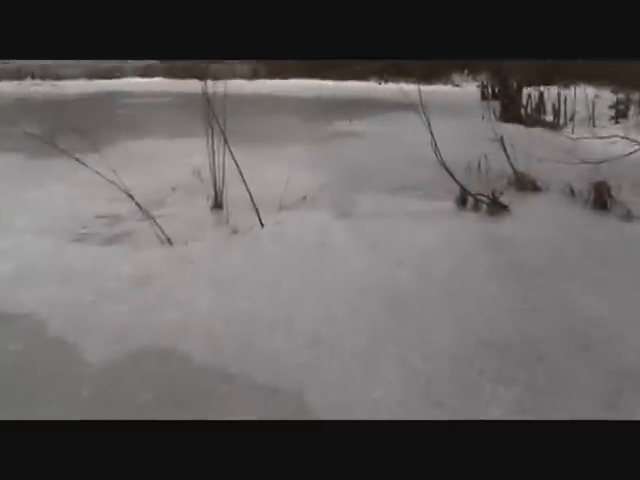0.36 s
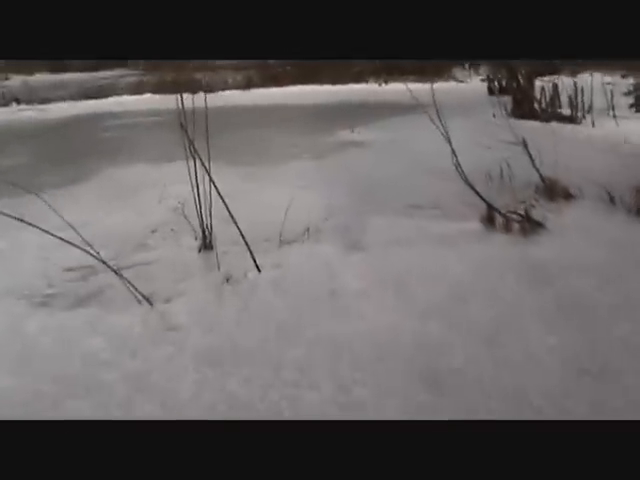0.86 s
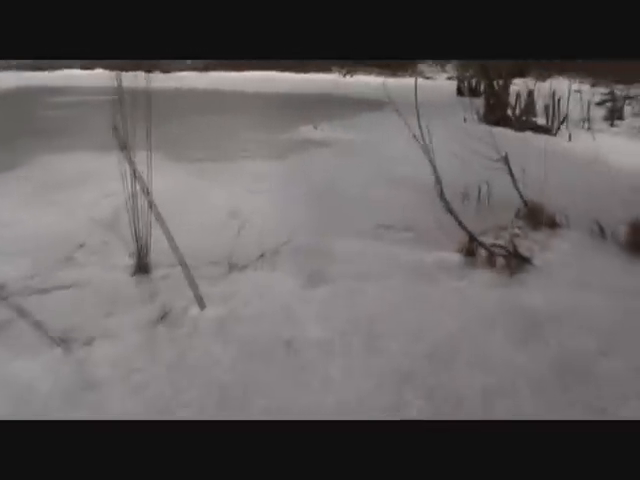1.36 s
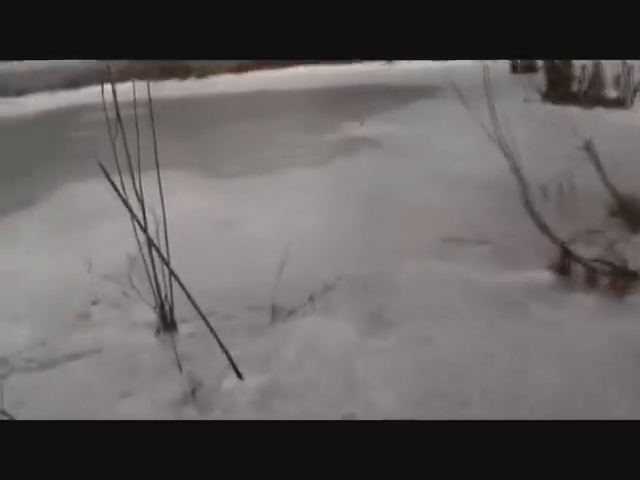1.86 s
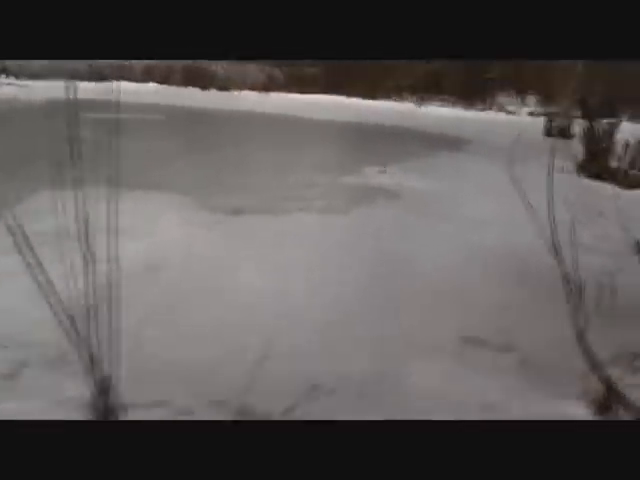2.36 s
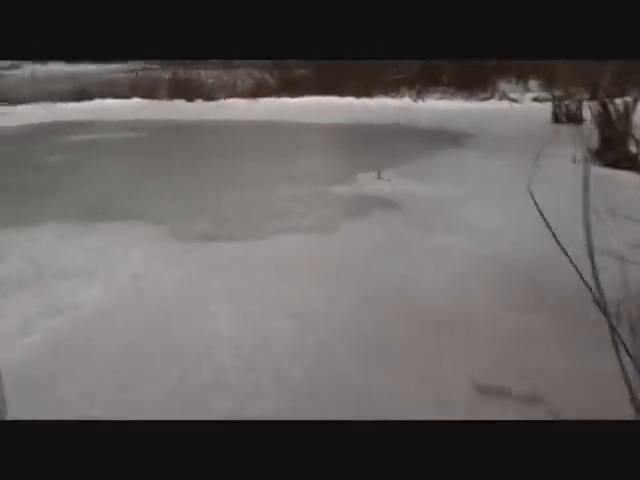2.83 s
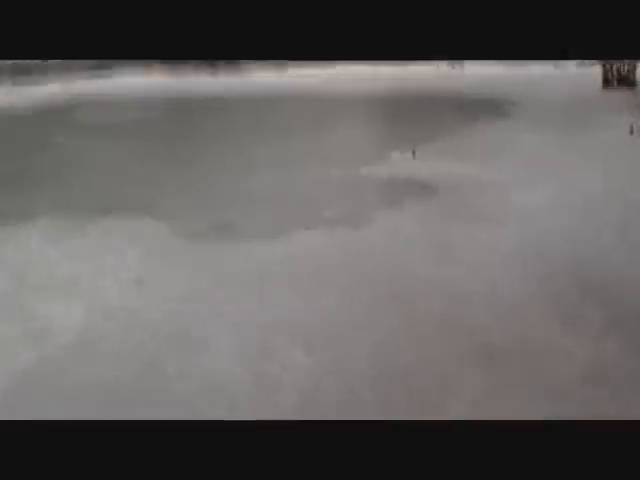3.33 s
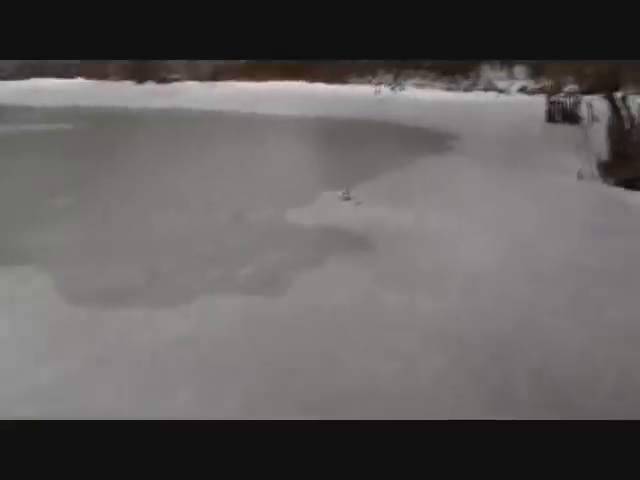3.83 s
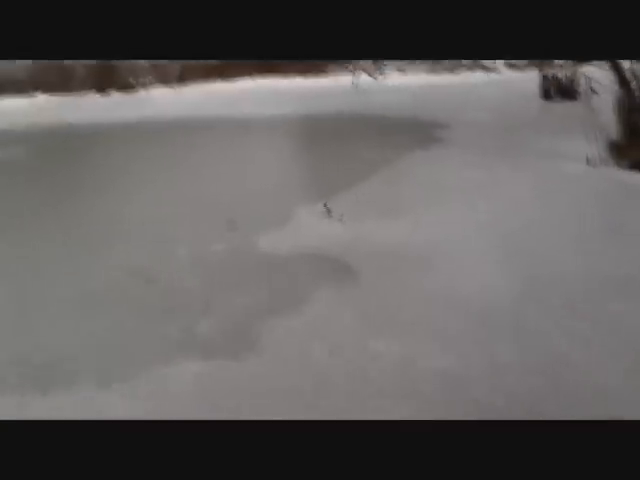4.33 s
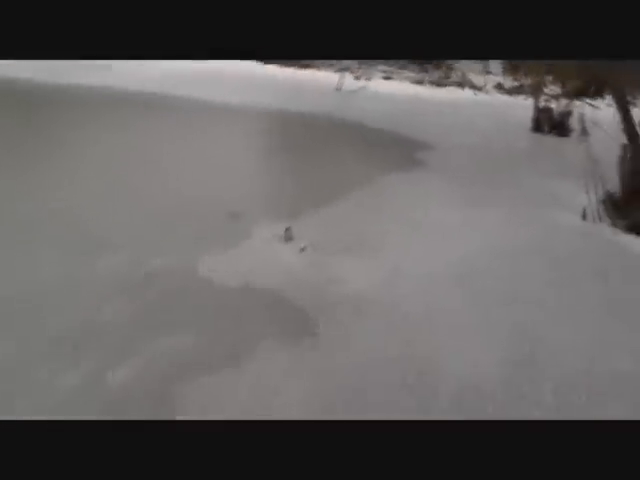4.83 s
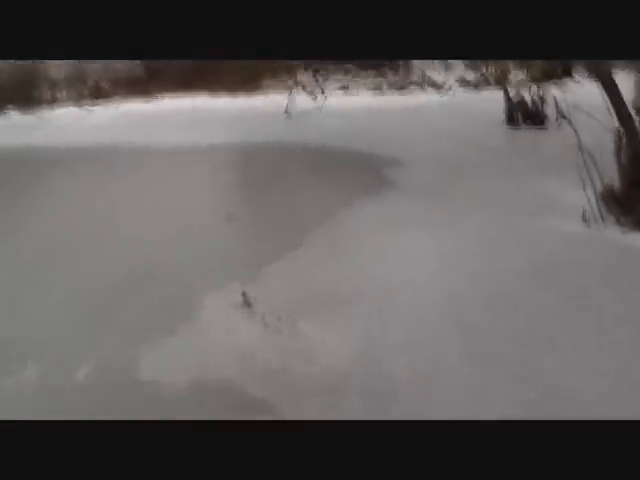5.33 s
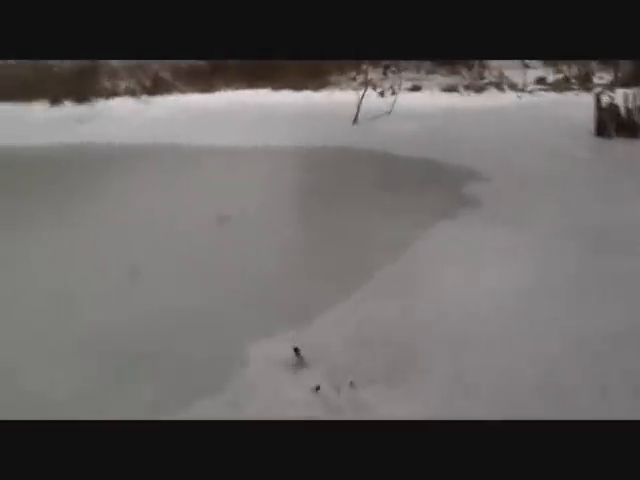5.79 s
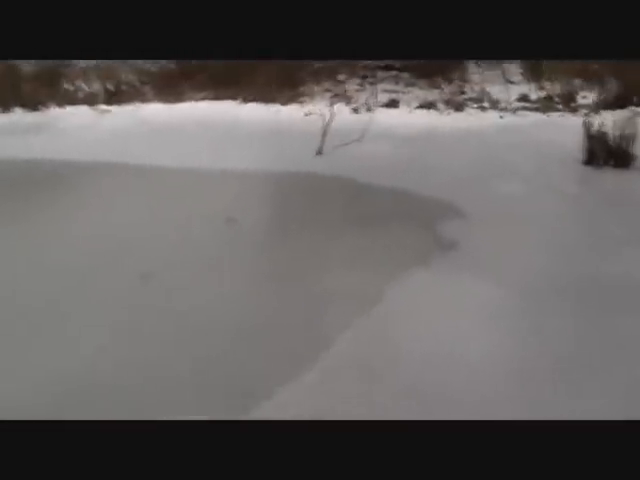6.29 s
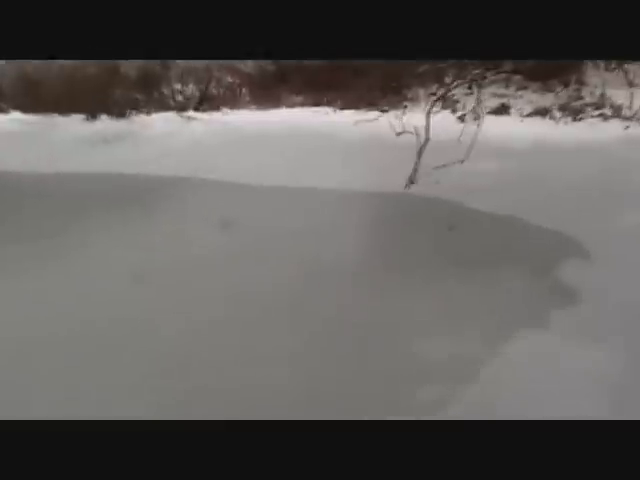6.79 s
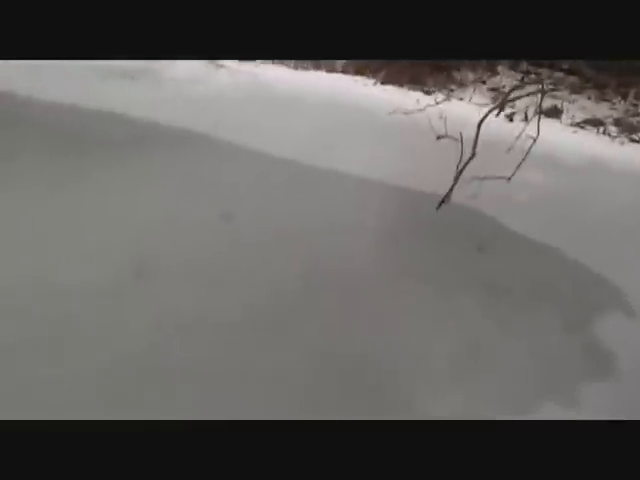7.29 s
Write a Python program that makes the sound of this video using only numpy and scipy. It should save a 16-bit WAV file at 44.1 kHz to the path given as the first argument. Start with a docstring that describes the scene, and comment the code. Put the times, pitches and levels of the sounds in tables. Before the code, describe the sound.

Steady crunching footsteps on icy snow, close and dry, in the open. The first is soft, then the steps become full and grinding, with one low heel thud near one second. Snaps and short pitched ice squeaks follow, rising higher in pitch later. A tiny bright metallic clink comes midway, then walking continues to the end. Handheld stereo microphone, hardly any background.

```python
"""Boots walk over crusted snow beside a frozen pond, heard from a small stereo microphone held by the walker.
From the start, over a faint hush of air, each step crushes the crust: noise bursts gathered in clumps ring
forty bands of resonators, and single cracks, kicked crumbs and scuffs are added to their envelopes.
At 1 s a heel thuds as a low damped sine; from 1.5 s lumps of ice squeak as narrow resonances.
Just before 5 s a small metal piece clinks in two decaying sines; the steps go on to the end."""
import sys
import numpy as np
from scipy import signal
from scipy.fft import rfft, irfft
from scipy.io import wavfile

SR = 44100
rng = np.random.default_rng(int(sys.argv[2]) if len(sys.argv) > 2 else 0)


def pcm_store(signal):
    """Save signal as 16-bit PCM."""
    levels = np.round(np.clip(np.atleast_2d(signal), -1, 1) * 32767)
    wavfile.write(sys.argv[1], SR, levels.astype(np.int16).T)


def volts(x):
    """Linear amplitude factor 10**(x/20) for a level x in dB, scalar or array-like."""
    e = np.asarray(x, float) / 20
    return 10 ** e


N = 337806


def rms_one(x):
    """Normalization: mean power becomes one."""
    return x / np.sqrt(np.mean(x ** 2) + 1e-20)


def at_hz(points, hz):
    """Interpolation on a logarithmic frequency axis."""
    point_hz, value = np.transpose(points)
    return np.interp(np.log(hz), np.log(np.maximum(point_hz, 1)), value)


def dying(clicks, t60):
    """Exponential decay: every click leaves an envelope that falls 60 dB in t60 seconds."""
    return signal.lfilter([1], [1, -volts(-60 / (t60 * SR))], clicks + 1e-18)


def resonance(x, hz, width):
    """Damped resonance: a pole pair with gain 1 at its peak and a bandwidth in Hz."""
    r = np.exp(-np.pi * width / SR)
    zeros = [(1 - r * r) / 2, 0, (r * r - 1) / 2]
    poles = [1, -2 * r * np.cos(2 * np.pi * hz / SR), r * r]
    return signal.lfilter(zeros, poles, x + 1e-18)


def grains(per_s, spread_db):
    """Shot noise: random clicks, mostly small and a few large, with rms 1."""
    sizes = volts(spread_db * np.minimum(rng.exponential(1, N), 5))
    return rms_one(sizes * (rng.random(N) < per_s / SR))


def clumps(per_s, spread_db, t60, steady):
    """Avalanche noise: pieces give way at once and crumble out, over a steady grinding."""
    crumbling = rms_one(dying(grains(per_s, spread_db), t60))
    return (steady + crumbling) / np.hypot(steady + 0.69, .8)


# Spectral slope of the open air. Each row: frequency in Hz, relative density in dB per Hz.
AIR_SPECTRUM = [(200, 4), (3000, -0.5), (15000, -7)]
AIR_DB = -45.5   # rms


def air():
    """Diffuse-field noise: a faint steady hush, uncorrelated in the two channels."""
    hz = np.maximum(np.fft.rfftfreq(N, 1 / SR), 1)
    spectrum = rfft(rng.standard_normal((2, N))) * volts(at_hz(AIR_SPECTRUM, hz))
    return volts(AIR_DB) * rms_one(irfft(spectrum, N))


# A boot takes weight, in a footfall or sinking further. Each row: full force in seconds, hold in seconds,
# nominal grit in dB, fade as the boot lifts in dB per second, lumps against grit in dB before the heel
# and toe change them, hollow packing snow against grit in dB likewise, rise before full force in seconds.
STEPS = [(0.0, 0.092, -27.5, 161, -1, -18, .03), (0.408, 0.14, -19, 152, 0.5, -6, 0.096),
         (0.966, 0.14, -20, 185, 0.5, -6.5, 0.033), (1.55, 0.18, -20, 123, -1, -6, 0.04),
         (2.162, 0.16, -19, 118, -1.5, -3, 0.015), (2.727, 0.16, -19, 105, -2.5, -6, 0.015),
         (3.374, 0.11, -18, 87, -6.5, -11, 0.021), (3.966, 0.091, -18, 133, -3, -14.5, 0.026),
         (4.130, 0.035, -19, 177, -0.5, -12.5, 0.017), (4.578, 0.042, -17.5, 83, -1.5, -7, 0.031),
         (5.185, 0.1, -22, 85, -2.5, -1, 0.019), (5.347, 0.025, -22.5, 77, 3.5, -5.5, 0.037),
         (5.789, 0.14, -17.5, 106, -2.5, -5.5, 0.013), (6.375, 0.18, -17, 95, -3.5, -5.5, 0.018),
         (7.054, 0.13, -21, 86, 0.5, -2, 0.011), (7.556, 0.021, -24, 310, 5.5, 0.5, 0.0052)]
# The boot slips in the print or drags through the crust. Each row: full force in seconds, hold in seconds,
# nominal grit in dB, lumps against grit in dB.
SCUFFS = [(.2, 0.21, -44.5, 1), (0.746, 0.084, -36.5, 3), (0.848, 0.11, -41, 0.5), (1.2, 0.1, -33.5, -1),
          (1.503, 0.052, -31, -4), (1.994, 0.2, -30.5, -4), (3.079, .29, -33, -7.5),
          (3.631, 0.0057, -23, -4.5), (4.244, 0.054, -19, -7.5), (4.34, 0.228, -26.5, -11),
          (4.8, 0.085, -28.5, -4), (4.964, 0.018, -25, -5), (5.075, 0.096, -33, 1),
          (6.049, 0.054, -33.5, 0), (6.318, 0.0032, -24.5, -4), (6.84, 0.09, -35.5, 0),
          (7.631, .04, -17, -4.5)]
SCUFF_RISE_S, SCUFF_FADE_DB_PER_S, SCUFF_PACK_DB = 0.032, 333, -3   # packing against lumps
CRUMBS_DB = -44.5, -46, -48   # loose crumbs that always trickle: grit, lumps, packing
HEEL_DB, HEEL_T60_S = 4, 0.78   # the heel packs the snow hardest at first
TOE_DB = -3.5   # the lumps break more softly until the weight rolls forward


def effort():
    """Power summation: grit, lump and packing envelopes of contacts that rise, hold and fade."""
    t = np.arange(N) / SR
    power = volts(2 * np.array(CRUMBS_DB))[:, None] * np.ones(N)
    contacts = [(s, held, db, fade, lump_db, pack_db, max(rise, .002), True)
                for s, held, db, fade, lump_db, pack_db, rise in STEPS]
    contacts += [(s, held, db, SCUFF_FADE_DB_PER_S, lump_db, lump_db + SCUFF_PACK_DB, SCUFF_RISE_S, False)
                 for s, held, db, lump_db in SCUFFS]
    for s, held, db, fade, lump_db, pack_db, rise, footfall in contacts:
        span = slice(max(round((s - rise) * SR), 0), round((s + 1) * SR))
        age = t[span] - s
        swell = np.clip(1 + age / rise, 0, 1) ** 4
        shape = swell * volts(db - fade * np.maximum(age - held, 0))
        heel = volts(-60 * np.maximum(age, 0) / HEEL_T60_S) * footfall
        lumps = volts(lump_db + TOE_DB * heel)
        pack = volts(pack_db + HEEL_DB * heel)
        power[:, span] += (shape * [np.ones_like(age), lumps, pack]) ** 2
    return np.sqrt(power)


# Single cracks of the crust. Each row: start in seconds, nominal peak in dB,
# lumps against grit in dB before the common lump gain, nominal T60 in seconds.
CRACKS = [(0.515, -18, -4, 0.14), (1.6288, -8, -3, 0.019), (1.725, -8, -11, 0.065),
          (1.8748, -9.5, -1.5, 0.024), (2.407, -13, -1.5, 0.041), (2.652, -12, -6.5, 0.16),
          (2.86, -6.5, -16, 0.38), (2.9956, -9, -8, 0.06), (3.297, -19, -33, 0.13),
          (3.907, -12.5, -22, 0.084), (3.463, -7.5, -5, 0.027), (3.512, -7.5, -20, 0.12),
          (4.506, -13, -9, 0.032), (4.698, -8.5, -6, 0.21), (5.379, -10.5, 0, 0.038),
          (5.569, -18.5, -4, 0.094), (5.702, -16, -5.5, 0.089), (5.733, -14, -8, 0.11),
          (6.685, -13.5, -1, 0.04), (6.7524, -14.5, -3.5, 0.072), (6.81, -10.5, -2.5, 0.044),
          (6.9703, -19, -11.5, 0.1), (7.3087, -11.5, -1.5, 0.045), (7.354, -15, -6.5, 0.076)]
# Crumbs and splinters that snap singly. Each row: start in seconds, nominal peak in dB.
TICKS = [(0.028, -20), (0.33, -21), (0.612, -13.5), (0.706, -27), (.838, -22), (.910, -24), (0.935, -20),
         (1.059, -4), (1.2728, -23), (1.797, -9), (1.993, -10.5), (2.642, -12), (3.708, -14.5),
         (4.5478, -13.5), (4.7598, -12), (4.812, -13), (5.099, -11.5), (5.147, -17), (5.692, -8.5),
         (6.8, -14), (6.939, -19), (6.982, -23), (6.997, -20)]
TICK_LUMP_DB, TICK_T60_S = -11.5, 0.011
LANDING_DB, LANDING_LUMP_DB, LANDING_T60_S = 9.5, -8, 0.03   # peak over the grit of the step
CRACK_CREST_DB, CRACK_RISE = 4, 0.03   # peak of a crack over its rms; rise time over T60


def crack_envelopes():
    """Impulsive fracture: grit and lump envelopes of single cracks; the lumps settle more slowly."""
    grit, lumps = np.zeros(N), np.zeros(N)
    ticks = [(s, db, TICK_LUMP_DB, TICK_T60_S) for s, db in TICKS]
    # the crust cracks as the weight of each step lands
    landings = [(s, db + LANDING_DB, LANDING_LUMP_DB, LANDING_T60_S) for s, _, db, *_ in STEPS]
    for s, peak_db, lump_db, t60 in list(CRACKS) + ticks + landings:
        at = round(s * SR)
        age = np.arange(min(N - at, SR // 4)) / SR
        t60 = max(t60, .005)
        span = slice(at, at + len(age))
        level_db = peak_db - CRACK_CREST_DB
        snap = 1.8 * volts(-60 * age / 0.005)   # the first break is the sharpest
        rise = 1 - np.exp(-age / (CRACK_RISE * t60))
        grit[span] += (rise + snap) * volts(level_db - 60 * age / t60)
        lumps[span] += rise * volts(level_db + lump_db + 10.5 - 60 * age / (1.28 * t60))
    return grit, lumps


# Boom of the ground under the packing snow along the path.
# Each row: time in seconds, boom against packing in dB.
BOOM = [(0, -12), (4.4, -15.5), (7.6, -17.5)]
# Thin crust on bare ice sounds higher than deep snow.
# Each row: time in seconds, tilt of the packing and lump sound in dB per octave.
HARDNESS = [(0, -3.5), (2.2, 2), (3, -2), (3.4, 1), (4.6, 4), (5.3, 1), (6.8, 1), (7.6, 2)]
# Spectral shape of breaking crust, normalized within each size. Each row: frequency in Hz, density in dB per Hz.
CRUST_SPECTRUM = [(40, -99), (96, -37.5), (194, -24), (312, -7), (479, 4.5), (1040, -5), (1680, -1.5),
                  (4340, -13.5), (10400, -4), (13400, -13.5), (15500, -43)]
# Edges between boom, packing, lumps and grit. Each entry: frequency in Hz.
SIZE_EDGES_HZ = [260, 800, 2600]
# Likeness of the channels. Each row: frequency in Hz, left-right correlation, held to 0.99 at most.
LIKENESS = [(240, 1), (950, 0.84), (3770, 0.57), (15000, 0.46)]
# Balance of the channels. Each row: frequency in Hz, left over right in dB.
LEAN = [(240, -0.3), (950, 2.5), (3770, 0)]
SPLINTERS_PER_S, SPLINTER_SHARE = 1200, .27   # crystals that snap over the whole treble; share of power
SKIRT_HZ = 283   # small pieces give little below this


def crust():
    """Modal excitation: fractures ring a few cycles at many pitches, small pieces more often than large."""
    grit_level, lump_level, pack_level = effort()
    grit_cracks, lump_cracks = crack_envelopes()
    t = np.arange(N) / SR
    # full weight grinds evenly, a lifted boot only sheds crumbs
    load = np.clip((20 * np.log10(grit_level) + 33.5) / 14, 0, 1)
    sole = clumps(per_s=80, spread_db=3.0, t60=.06, steady=.85 + 2.2 * load)   # the whole sole shifts
    grit = grit_level * sole * clumps(per_s=130, spread_db=3.5, t60=0.016, steady=1.1 + 2.3 * load)
    lumps = lump_level * sole * clumps(per_s=56, spread_db=6.0, t60=0.15, steady=1.1 + 17.0 * load)
    pack = pack_level * sole * clumps(per_s=260, spread_db=3.5, t60=0.63, steady=4.5 + 2.6 * load)
    grit = np.hypot(grit, grit_cracks)
    lumps = np.hypot(lumps, lump_cracks * volts(-6.5))
    pack = np.hypot(pack, lump_cracks * volts(-8.0))
    boom = pack * volts(np.interp(t, *np.transpose(BOOM)))
    drive = boom, pack, lumps, grit

    tilt_db = np.interp(t, *np.transpose(HARDNESS))
    pitches = np.geomspace(45, 15500, num=40)
    sizes = np.digitize(pitches, SIZE_EDGES_HZ)
    power = volts(2 * at_hz(CRUST_SPECTRUM, pitches)) * pitches
    splinters = np.array([grains(SPLINTERS_PER_S, spread_db=3.0) for _ in range(2)])
    splinters = splinters * rng.choice([-1, 1], (2, N))
    ground, pieces = np.zeros((2, N)), np.zeros((2, N))
    for hz, band_power, size in zip(pitches, power, sizes):
        share = band_power / power[sizes == size].sum()
        per_s = 600 * (hz / 1000) ** .8
        born = rng.random((2, N)) < per_s / SR
        force = born * rng.standard_normal((2, N)) * np.sqrt(SR / per_s)
        if size > 2:
            force = np.sqrt(1 - SPLINTER_SHARE) * force + np.sqrt(SPLINTER_SHARE) * splinters
        # pieces of one size come in patches
        patchy = clumps(per_s=25, spread_db=2.5, t60=.09, steady=1.6)
        if 200 < hz < 1500:
            patchy = patchy * volts(tilt_db * np.log2(min(hz, 1000) / 550))
        width = 0.19 * hz
        ringing = resonance(force * drive[size] * patchy, hz, width)
        mid, side = ringing * np.sqrt(share * SR / (np.pi * width))
        alike = np.clip(at_hz(LIKENESS, hz), 0, .99)
        pair = np.sqrt((1 + alike) / 2) * mid + np.sqrt((1 - alike) / 2) * side * [[1], [-1]]
        pair = pair * volts(at_hz(LEAN, hz) / 2 * np.array([[1], [-1]]))
        if size == 0:
            ground += pair
        else:
            pieces += pair
    skirt = signal.butter(2, SKIRT_HZ, "high", fs=SR, output="sos")
    return ground + signal.sosfilt(skirt, pieces)


# Heels reaching the ice below. Each row: start in seconds, level in dB before the onset is softened.
THUDS = [(0.999, -27)]
THUD_HZ, THUD_T60_S = 90.4, 0.1


def thuds():
    """Damped oscillation: a soft blow gives one low swing that swells in over a few milliseconds."""
    s, level_db = np.transpose(THUDS)
    hits = np.zeros(N)
    hits[np.round(s * SR).astype(int)] = volts(level_db)
    soft = signal.lfilter([.01], [1, -.99], dying(hits, THUD_T60_S))
    return soft * np.sin(2 * np.pi * THUD_HZ * np.arange(N) / SR)


# A lump of ice slips or breaks loose and rings at one pitch.
# Each row: start in seconds, pitch in Hz, peak in dB.
SQUEAKS = [(1.548, 587, -11.5), (2.661, 486, -9), (2.728, 650, -8), (3.001, 700, -16), (3.351, 650, -23),
           (3.399, 850, -11.5), (4.052, 905, -11), (4.077, 910, -13.5), (4.559, 1230, -12.5),
           (4.590, 980, -12.5), (5.448, 1470, -12), (6.554, 1570, -11), (6.616, 1800, -11.5),
           (6.668, 2000, -18), (6.714, 2000, -21.5), (7.118, 1450, -9), (7.185, 2000, -10),
           (7.203, 1500, -12), (7.222, 1990, -12.5), (7.473, 1990, -25), (7.560, 800, -8)]
SLIP_S, SQUEAK_WIDTH = .012, 0.23   # length of the slip; bandwidth over pitch


def squeaks():
    """Friction-driven resonance: each slip is a short rough push into one narrow mode."""
    out, size = np.zeros(N + SR), SR // 20
    age = np.arange(size) / SR / SLIP_S
    push = np.sin(np.pi * np.minimum(age, 1) ** .5)
    for s, hz, peak_db in SQUEAKS:
        rough = rng.standard_normal(size)
        ring = resonance(rough * push, hz, SQUEAK_WIDTH * hz)
        at = round(s * SR)
        out[at:at + size] += volts(peak_db) * ring / np.abs(ring).max()
    return out[:N]


# Metal clinks. Each row: start in seconds, upper mode's starting level in dB before the channel balance,
# lower mode against upper in dB.
CLINKS = [(4.7166, -13, -13.5), (4.7264, -13, -7), (4.7617, -8.5, 0), (4.8544, -20, 6), (4.885, -12, -21)]
# Modes of the metal, upper first. Each row: frequency in Hz, T60 in seconds.
METAL_MODES = [(8660, 0.025), (7760, 0.029)]


def clinks():
    """Modal ringing: a small metal piece on the clothing is struck and rings in two short modes."""
    s, upper_db, lower_db = np.transpose(CLINKS)
    out = np.zeros(N)
    for (hz, t60), level_db in zip(METAL_MODES, (upper_db, upper_db + lower_db)):
        hits = np.zeros(N)
        hits[np.round(s * SR).astype(int)] = volts(level_db)
        out += dying(hits, t60) * np.sin(2 * np.pi * hz * np.arange(N) / SR)
    return out * volts(np.array([[1.0], [-1.0]]))   # left up 1 dB, right down 1 dB


def scene():
    """Superposition: the pressures of all sources add."""
    return air() + crust() + thuds() + squeaks() + clinks()


def band_limit(x):
    """A steep low-pass at the top of the band."""
    return signal.sosfilt(signal.butter(12, 16990, fs=SR, output="sos"), x)


def record(dry):
    """Saturation and band limiting: peaks are rounded, then the top of the treble is cut."""
    ceiling, cutoff_hz = .86, 16400
    rounded = ceiling * np.tanh(dry / ceiling)
    lowpass = signal.cheby2(12, 60, cutoff_hz, fs=SR, output="sos")
    mix = signal.sosfilt(lowpass, rounded)
    return band_limit(mix)


dry = scene()
out = record(dry)
pcm_store(out)
```